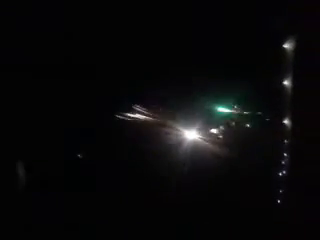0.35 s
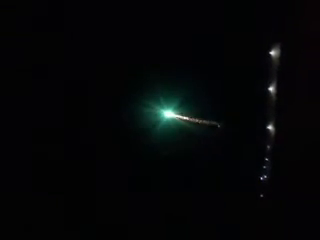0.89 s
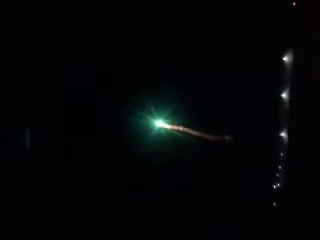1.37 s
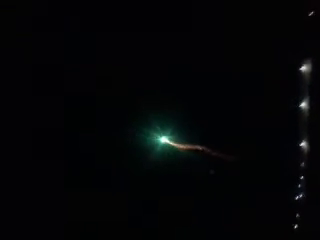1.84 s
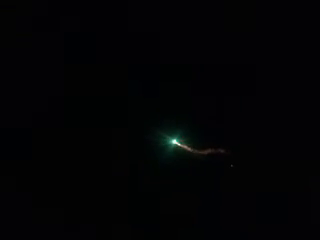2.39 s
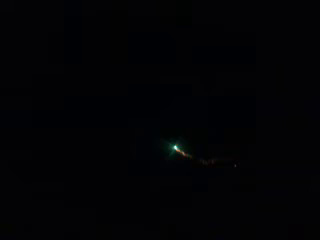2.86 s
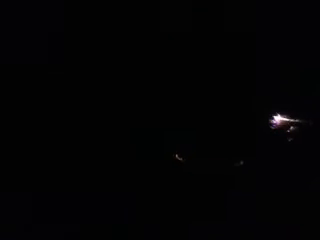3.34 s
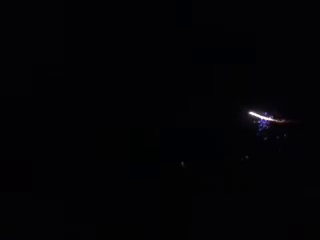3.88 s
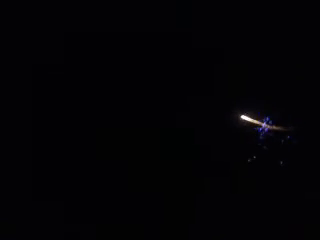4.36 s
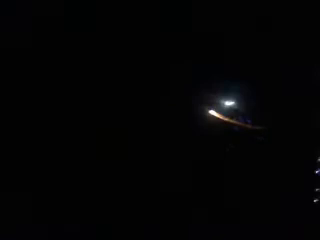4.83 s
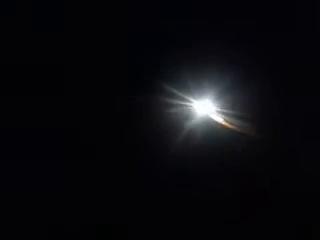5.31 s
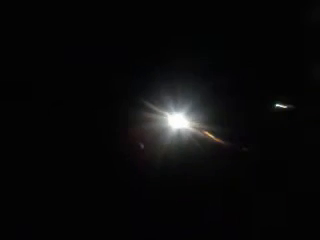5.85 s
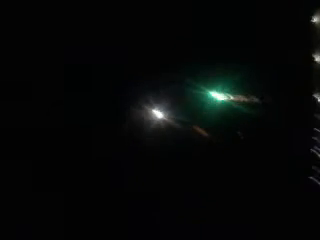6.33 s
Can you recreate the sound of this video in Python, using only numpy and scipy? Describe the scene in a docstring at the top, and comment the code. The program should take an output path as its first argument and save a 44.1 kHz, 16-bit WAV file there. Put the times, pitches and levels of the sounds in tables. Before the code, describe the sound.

Fireworks outdoors: a dense burst of bangs with a shrill descending whistle, then sparser booms and knocks rolling back, with faint regular camera ticks.

```python
"""A rocket's whistle, falling in pitch, is heard first over a volley of bangs; single bangs and dull knocks follow
and roll back from the surroundings. Crackle, camera ticks, far rumble and faint hiss lie below.
The whistle is narrow-band noise in two strands, a bang a pressure step with scattered noise, echoes
are noise decaying band by band, and ticks ring a shell's modes. A converter at 16 kHz clips the peaks."""
import sys
import numpy as np
from scipy import signal
from scipy.fft import rfft, irfft, next_fast_len
from scipy.io import wavfile
from scipy.ndimage import uniform_filter1d

SR = 44100
rng = np.random.default_rng(int(sys.argv[2]) if len(sys.argv) > 2 else 0)


def attenuation_scalar(level_db):
    """Turn a level in dB into a linear amplitude multiplier (20 dB per decade)."""
    decades = np.asarray(level_db, float) / 20
    return 10 ** decades


def int16_out(signal):
    """Quantize to a 16-bit WAV file."""
    q = np.round(np.clip(np.atleast_2d(signal).T, -1, 1) * 32767)
    wavfile.write(sys.argv[1], SR, q.astype(np.int16))


N = 284886

# Relative spectrum of an explosion. Each row: frequency in Hz, density in dB per Hz.
BLAST_SPECTRUM = [(100, -18), (200, -23), (400, -15.5), (520, -11.5), (720, -17), (950, -5.5), (1200, -12),
                  (1700, -6.5), (2300, 0.5), (2800, -2.5), (3900, -10), (5200, -10), (6700, -8),
                  (7300, -14.5)]


def evened(x):
    """Normalises signal power: scales to rms 1."""
    return x / np.sqrt(np.mean(x ** 2) + 1e-20)


def read(points, hz):
    """Interpolates on a log frequency axis, near the ear's own scale."""
    f, value = np.transpose(points)
    return np.interp(np.log(hz + 1), np.log(f + 1), value)


def add(mix, s, sound):
    """Superposes a sound on the mix, from s seconds on."""
    part = mix[round(s * SR):][:len(sound)]
    part += sound[:len(part)]


def colour(x, points):
    """Linear filtering: multiplies the spectrum by gains in dB."""
    hz = np.fft.rfftfreq(len(x), 1 / SR)
    return irfft(rfft(x) * attenuation_scalar(read(points, hz)), len(x))


def curve(rows):
    """Piecewise linear control: each column at every sample, and a 50 ms fade before the last row."""
    s, *columns = np.transpose(rows)
    t = np.arange(N) / SR
    return [np.interp(t, s, c) for c in columns], np.clip((s[-1] - t) * 20, 0, 1)


def resonate(x, hz, rough):
    """Quadrature modulation: slow noise, blended from narrow to wide by rough, is shifted up to the curve hz."""
    poles = np.exp(-np.pi * np.array([60, 350]) / SR)
    narrow, wide = [evened(signal.lfilter([1], np.poly([r, r]), x, axis=1)) for r in poles]
    share = np.clip(rough, 0, 1)
    # reversing the wide noise makes it differ from the narrow
    a, b = np.sqrt(1 - share) * narrow + np.sqrt(share) * wide[::-1, ::-1]
    phase = 2 * np.pi * np.cumsum(hz) / SR
    return a * np.cos(phase) + b * np.sin(phase)


def night():
    """Stationary random noise: far rumble and hiss, with slightly patchy levels in time and frequency."""
    # Relative spectrum of the background. Each row: frequency in Hz, density in dB per Hz.
    night_spectrum = [(12, -12.5), (25, 2), (42, -7), (70, -11.5), (100, -29.5), (140, -24.5), (200, -10),
                      (295, -6.5), (440, -6.5), (1170, -12.5), (2230, .5), (3400, -13.5), (6610, -10),
                      (7300, -11.5)]
    level_db, patch_db = -37.5, 1.6
    frames, hz = N // 1024 + 5, np.fft.rfftfreq(4096, 1 / SR)
    a, b, patches = rng.standard_normal((frames, 2049, 3)).T
    patches = uniform_filter1d(patches, size=48, axis=0)
    patches = evened(uniform_filter1d(patches, size=3, axis=1))
    z = (a + 1j * b) * attenuation_scalar(read(night_spectrum, hz)[:, None] + patch_db * patches)
    noise = signal.istft(z, nperseg=4096, noverlap=3072)[1][:N]
    return attenuation_scalar(level_db) * evened(noise)


def ticks():
    """Modal excitation: inside the camera, a rattle of a few ms rings the shell's damped modes."""
    # Steady runs of ticks. Each row: first tick in seconds, number of ticks.
    tick_runs = [(1.1697, 3), (2.3462, 9), (5.9215, 2)]
    # Fainter ticks between them. Each row: start in seconds, peak in dB.
    faint_ticks = [(1.386, -17), (2.9077, -24.5), (3.0724, -26), (3.3858, -25.5), (6.078, -24.5),
                   (6.1592, -28.5)]
    # Modes of the shell. Each row: lowest frequency in Hz, relative level in dB, t60 in seconds.
    shell_modes = [(600, -9, .022), (1500, -16, .008), (2300, -2, .012), (2700, -2, .012),
                   (3600, -11, .006), (4600, -8, .007), (5400, -4, .008), (6100, -1, .009), (6700, 0, .009)]
    period_s, steady_db, spread_db = .3999, -13.5, .8
    t, out = np.arange(2000) / SR, np.zeros(N)
    steady = [(first + k * period_s, steady_db + spread_db * rng.standard_normal())
              for first, count in tick_runs for k in range(count)]
    u = np.arange(900) / 105  # time over the 105-sample decay of the rattle
    high_pass = signal.butter(2, 450, "high", fs=SR)
    for s, peak_db in steady + faint_ticks:
        # each mode is up to 5 % sharp, anew for every tick
        ring = sum(attenuation_scalar(db - 60 * t / t60) * np.sin(2 * np.pi * hz * rng.uniform(1.0, 1.05) * t)
                   for hz, db, t60 in shell_modes)
        rattle = rng.standard_normal(900) * u * np.exp(-u)
        tick = signal.lfilter(*high_pass, signal.fftconvolve(rattle, ring))
        add(out, s, attenuation_scalar(peak_db) * tick / abs(tick).max())
    return out


def crackle():
    """Shot noise: burning stars give dense tiny blasts at random instants, a few of them large."""
    # Course of the crackle. Each row: time in seconds, level in dB.
    crackle_course = [(0.0, -10.5), (0.16, -18), (0.34, -37), (0.58, -23.5), (0.74, -16.5), (1.02, -37),
                      (1.4, -43.5)]
    cracks_per_s = 400
    (level_db,), on = curve(crackle_course)
    size = attenuation_scalar(2.6 * np.minimum(rng.exponential(1, N), 5))
    cracks = size * (rng.random(N) < cracks_per_s / SR)
    puff = rng.standard_normal(256) * np.exp(-np.arange(256) / 40)
    sound = colour(signal.oaconvolve(cracks, puff)[:N], BLAST_SPECTRUM)
    return attenuation_scalar(level_db) * on * evened(sound)


def surroundings(x):
    """Diffuse reverberation: a dense, lumpy cloud of echoes, each band dying at its own speed."""
    # Decay of the cloud. Each row: frequency in Hz, t60 in seconds.
    roll_decay = [(200, 1.2), (530, 2.82), (1400, 2.1), (2600, 2.4), (4500, 1.29), (7000, 1.27)]
    # Returns from walls. Each row: delay in seconds, spread in seconds, height above the cloud in dB.
    walls = [(0.052, 0.0091, 4.9), (.075, 0.013, 7.2)]
    near_db, near_s = 10.5, 0.031  # near scatter above the cloud
    early_bass_db, early_bass_hz = -2, 1300  # near scatter and walls return less bass
    hz, t, z = signal.stft(rng.standard_normal(2 * SR), SR, nperseg=256)
    lumps = uniform_filter1d(rng.standard_normal(z.shape), size=6, axis=0)
    lumps = evened(uniform_filter1d(lumps, size=3, axis=1))
    early_db = near_db * np.exp(-t / near_s)
    early_db = early_db + sum(db * np.exp(-((t - s) / spread) ** 2) for s, spread, db in walls)
    thin_db = early_bass_db / (1 + (hz[:, None] / early_bass_hz) ** 4) * np.exp(-(t / 0.17) ** 4)
    decay_db = -60 * t / read(roll_decay, hz)[:, None]
    tail = signal.istft(z * attenuation_scalar(early_db + thin_db + decay_db + 1.6 * lumps), SR, nperseg=256)[1]
    return signal.fftconvolve(x, tail / np.linalg.norm(tail))[:N]


def knock(noise, peak_db, pitch_hz):
    """Damped resonance: a sharp ring at the pitch, roughened by a puff of noise in a broad band around it."""
    base_ms, cycles = 4.5, 1.65  # the puff decays over a few ms and a few cycles of the pitch
    u = np.arange(len(noise)) * 1000 / SR  # ms
    hz = np.fft.rfftfreq(len(noise), 1 / SR)
    band = 1 / (1 + ((hz - pitch_hz) / (.25 * pitch_hz)) ** 2) + 0.095 / (1 + (hz / 3500) ** 2)
    rise = 1 - np.exp(-u * pitch_hz / 1500)
    fall = np.exp(-u / (base_ms + cycles * 1000 / pitch_hz))
    puff = evened(irfft(rfft(noise) * band)) * rise * fall
    ring = np.sin(2 * np.pi * pitch_hz * u / 1000) * np.exp(-u * pitch_hz / 2500)
    sound = puff + 0.38 * ring
    sound = signal.lfilter(*signal.butter(2, .4 * pitch_hz, "high", fs=SR), sound)
    return attenuation_scalar(peak_db) * sound / abs(sound).max()


def bang(noise, peak_db, thump_db, bass_db, treble_db):
    """Blast wave: a pressure step, then scatter, bass first and treble last; also a bare click of like colour."""
    thump_lag_ms, thump_ms = 2.14, 0.49  # the thump comes a moment after the crack
    rise_ms, fall_ms = 1.37, 5.6
    t = np.arange(len(noise)) / SR
    hz = np.fft.rfftfreq(len(noise), 1 / SR)
    low = 1 / (1 + (hz / 1300) ** 6)
    high = 1 / (1 + (3500 / (hz + 1)) ** 6)
    step = np.maximum(t * 1000 - thump_lag_ms, 0) / thump_ms
    sound = attenuation_scalar(thump_db) * step * (2 - step) * np.exp(-step)
    click = attenuation_scalar(-17.5) * sound
    for share, db, lag_s in ((low, bass_db, 0), (1 - low - high, 0, .002), (high, treble_db, .003)):
        u = np.maximum(t - lag_s, 0) * 1000
        shape = (1 - np.exp(-u / rise_ms)) * np.exp(-u / fall_ms)
        band = share * attenuation_scalar(read(BLAST_SPECTRUM, hz))
        scatter = attenuation_scalar(db) * evened(irfft(rfft(noise) * band)) * shape / shape.max()
        bare = np.roll(irfft(band), 300)  # centred pulse, 300 samples late
        sound = sound + scatter
        click = click + bare * np.linalg.norm(scatter) / np.linalg.norm(bare)  # equal energy
    return attenuation_scalar(peak_db) * sound, attenuation_scalar(peak_db) * click


def bangs():
    """Superposition: bangs and knocks as direct sound, and three feeds for echoes from different sides."""
    # Bangs. Each row: start in seconds, level of the middle band in dB, then relative to it the gain
    # of the thump in dB, of the bass in dB and of the treble in dB, and the gain of the echo feed in dB.
    bang_rows = [(0.059, -1.5, -12, -1.5, -11, -2), (0.1194, -1.5, -12, -1.5, -4.5, -4),
                 (0.195, -2.5, 3, -2, -5.5, -2.5), (0.2612, 3, -18, -4.5, -5, -5.5),
                 (0.3253, -37, 2, -1, 6, 12), (0.5398, -19.5, -9.5, -17, -16, 11),
                 (0.5698, -25.5, -18, -13, -11.5, 23), (0.6606, -2.5, -18, -13.5, -13, 1),
                 (0.7549, -10.5, -18.5, -10, -12.5, 9), (0.8847, -15.5, -4, -12.5, -7, 6.5),
                 (0.9986, -17.5, -15, -12, -3.5, 5.5), (1.2079, -17.5, -16, -11.5, -13, 6),
                 (2.1686, -19, 15.5, -9.5, -1.5, 9), (3.5985, -18.5, 10.5, -11.5, -7, 8),
                 (3.677, -1.5, -2, -4, -3, 0), (4.7335, -22, 12, -2, -18, -1.5),
                 (4.9319, -14.5, 11.5, -10.5, -3.5, 4.5), (6.3555, -21, 9.5, -5, -2, 7),
                 (6.4228, -28, -19, -24, -1, 13.5)]
    # Dull knocks, from far shells and slaps off walls. Each row: start in seconds, peak in dB,
    # pitch in Hz, gain of the echo feed in dB.
    knock_rows = [(0.394, -9.5, 527, -11.5), (0.96, -12, 2215, -4), (1.075, -15, 1922, -6),
                  (1.108, -13.5, 1020, 1.5), (1.293, -19, 505.5, 1), (1.787, -19.5, 2120, 1.5),
                  (2.307, -18, 567, -8.5), (2.335, -8, 2244, 1.5), (2.649, -23, 1440, -12),
                  (3.216, -22.5, 1290, -6), (3.223, -23.5, 2150, -3), (3.257, -31, 890, -18),
                  (3.812, -9.5, 550, -1.5), (3.96, -14, 2000, -15), (4.65, -22, 1800, -1),
                  (4.774, -14, 906, -13), (5.066, -28, 593, -9), (5.097, -3.5, 1930, -5.5),
                  (5.345, -19.5, 1040, -8), (5.983, -27, 1480, 2), (6.021, -27, 1700, 0)]
    direct, feeds = np.zeros(N), np.zeros((3, N))
    for k, (s, *blast, echo_db) in enumerate(bang_rows):
        sound, click = bang(rng.standard_normal(4096), *blast)
        add(direct, s, sound)
        add(feeds[k % 3], s, attenuation_scalar(echo_db) * click)
    for k, (s, *blow, echo_db) in enumerate(knock_rows):
        sound = knock(rng.standard_normal(2048), *blow)
        add(direct, s, sound)
        add(feeds[k % 3], s, attenuation_scalar(echo_db) * sound)
    return direct, feeds


def whistle():
    """Tube resonance: unsteady burning blows a narrow, falling strand of noise, doubled by an echo at a
    slightly different pitch, with a faint octave."""
    # Course of the rocket, which burns out near 1.2 s and trails away. Each row: time in seconds,
    # pitch in Hz, level in dB, distance between the two strands in Hz.
    whistle_course = [(0.0, 3050, -7.5, 69.94), (0.2, 2928, -3, 110.2), (0.4, 2796, -7, 130.2),
                      (0.52, 2759, -3.5, 60.6), (0.68, 2668, -8, 58.87), (0.82, 2596, -4, 148.9),
                      (0.97, 2621, -4.5, 128.2), (1.05, 2697, -7, 62.34), (1.17, 2722, -11, 59.6),
                      (1.27, 2656, -25.5, 90.6), (1.72, 2653, -32, 70.84), (1.8, 2632, -26.5, 40.3),
                      (2.16, 2577, -37, 38.2)]
    wobble_hz, octave_db = 14, -17.5
    rough_at_0_db, rough_per_db = 0.11, .008  # share of wide noise; the whistle blurs as it fades
    (hz, level_db, apart_hz), on = curve(whistle_course)
    wobble = uniform_filter1d(rng.standard_normal(N), size=2500)
    wobble = evened(uniform_filter1d(wobble, size=2500))
    rough = rough_at_0_db - rough_per_db * level_db
    strands = [resonate(rng.standard_normal((2, N)), hz + wobble_hz * wobble + side * apart_hz, rough)
               for side in (-.5, .5)]
    tone = attenuation_scalar(level_db) * on * evened(sum(strands))
    # squaring doubles the pitch, so the octave grows with the square of the level
    octave = signal.lfilter(*signal.butter(2, 3500, "high", fs=SR), tone ** 2)
    return tone + attenuation_scalar(octave_db) * octave


def scene():
    """Superposition of all sources and echoes; the microphone's low cut acts on all but the night."""
    # Low cut of the microphone. Each row: frequency in Hz, gain in dB.
    low_cut = [(30, -10.5), (70, -24), (110, -11.5), (220, 0)]
    whistle_echo_db = -10.5
    rocket = whistle()
    direct, feeds = bangs()
    feeds[0] += attenuation_scalar(whistle_echo_db) * rocket
    echoes = sum(surroundings(feed) for feed in feeds)
    sources = rocket + direct + echoes + crackle() + ticks()
    return (colour(sources, low_cut) + night())[None]


def low_pass(x):
    """Removes everything above the highest recorded frequency."""
    return signal.sosfilt(signal.butter(12, 16470, fs=SR, output="sos"), x)


def record(dry):
    """Sampling and clipping: band limit, 16 kHz, hard overload; what is cut off leaks with its mirror image."""
    # Leak of the overload products. Each row: frequency in Hz, gain in dB.
    overload_leak = [(6500, -0.5), (8000, -3), (9000, -29.5), (10000, -35.5), (13000, -12.5),
                     (15500, -57.5), (16000, -120)]
    edge_hz, full_scale_db, output_limit_db = 7030, -3.2, -2.7
    blocks = next_fast_len(N // 441 + 1)
    long, short = 441 * blocks, 160 * blocks  # equal durations at 44.1 and 16 kHz
    hz = np.fft.rfftfreq(long, 1 / SR)[:short]
    passed = rfft(dry[0], long)[:short] / (1 + (hz / edge_hz) ** 80)
    sampled = irfft(passed[:short // 2 + 1], short) * short / long
    full_scale = attenuation_scalar(full_scale_db)
    cut = np.clip(sampled, -full_scale, full_scale) - sampled
    # the full spectrum of the 16 kHz signal mirrors about 8 kHz
    leak = np.fft.fft(cut) * attenuation_scalar(read(overload_leak, hz)) * long / short
    out = irfft(passed + leak, long)
    limit = attenuation_scalar(output_limit_db)
    limited = np.clip(out[None, :N], -limit, limit)
    return low_pass(limited)


dry = scene()
out = record(dry)
int16_out(out)
```